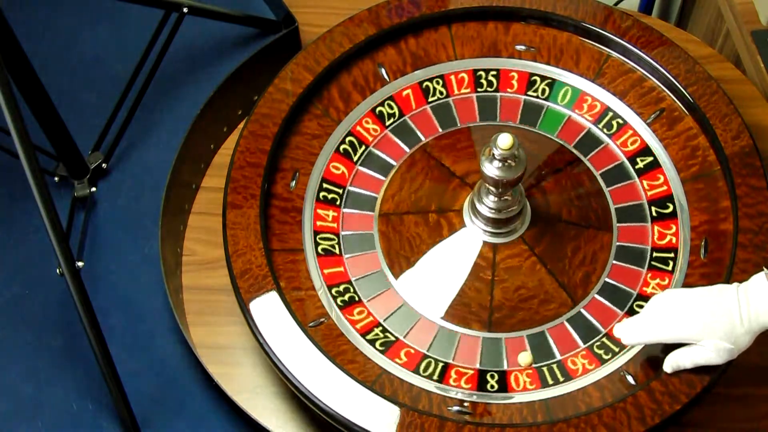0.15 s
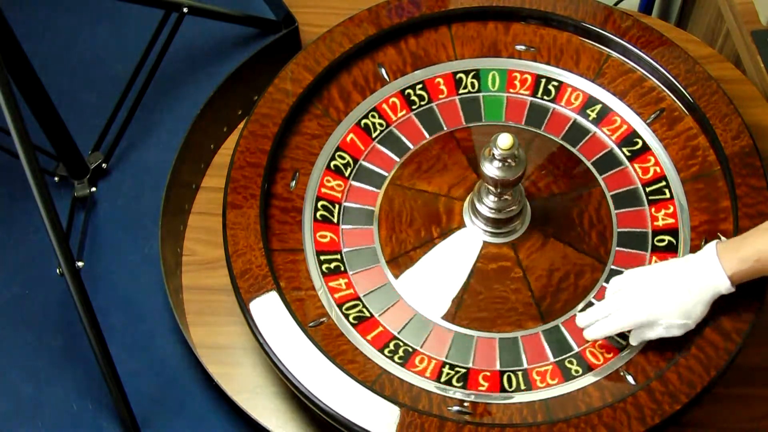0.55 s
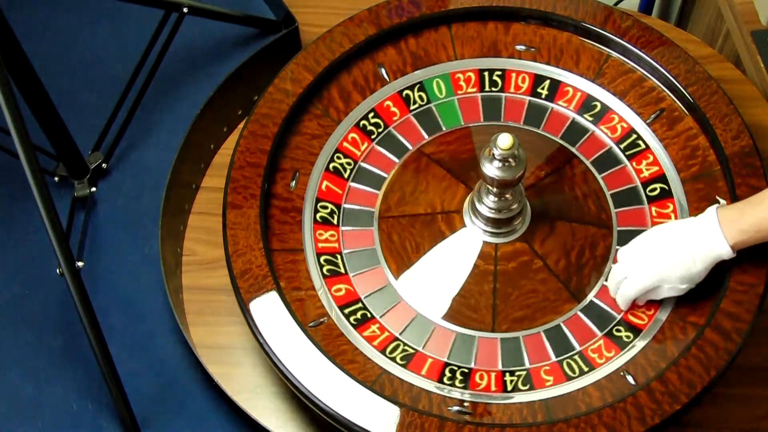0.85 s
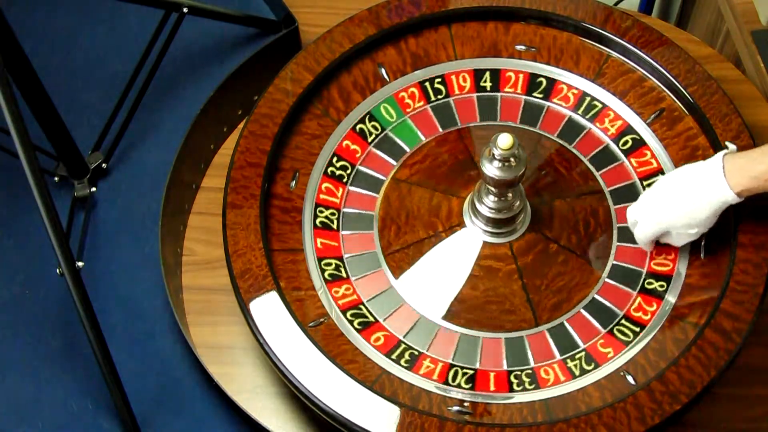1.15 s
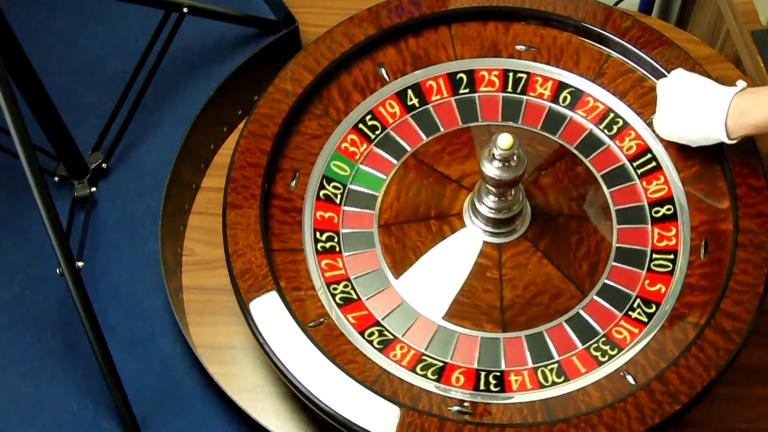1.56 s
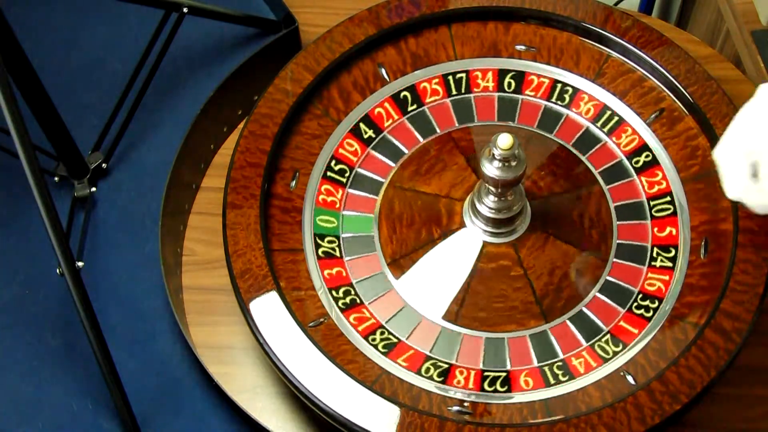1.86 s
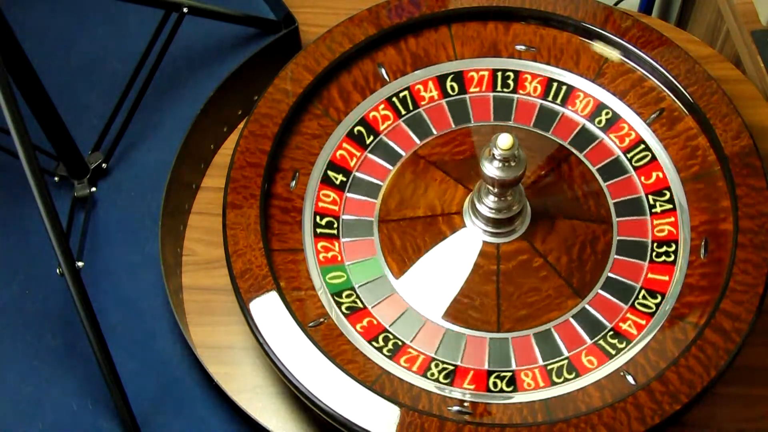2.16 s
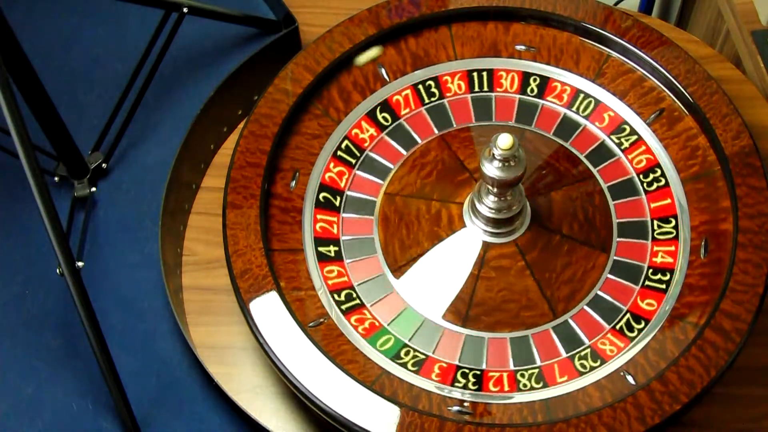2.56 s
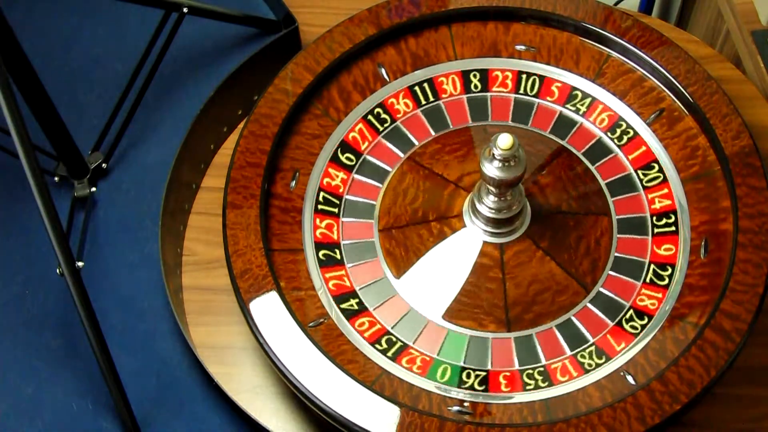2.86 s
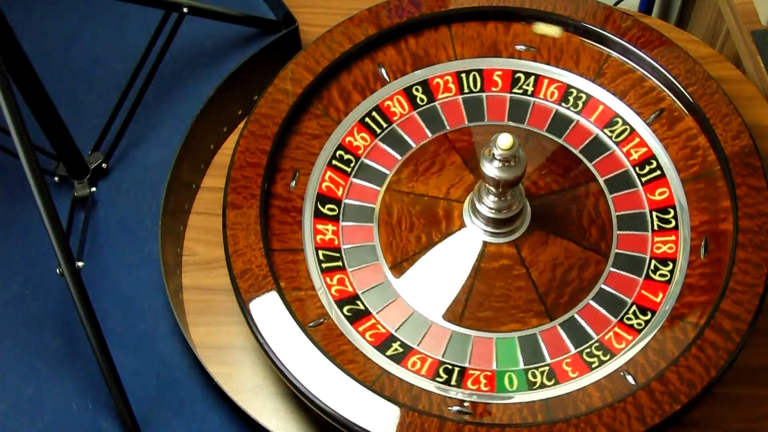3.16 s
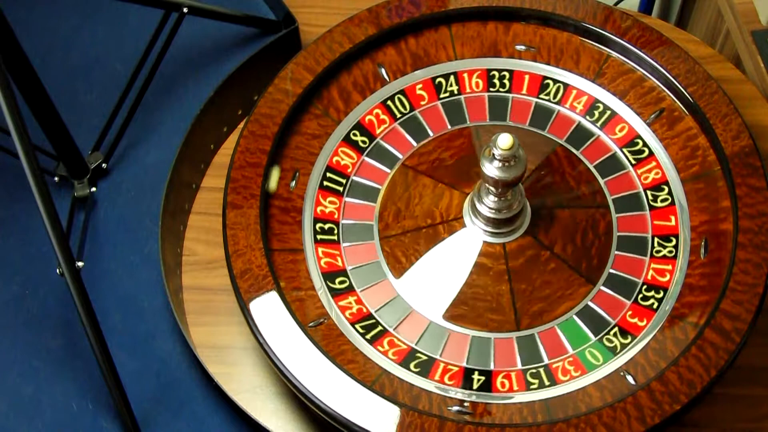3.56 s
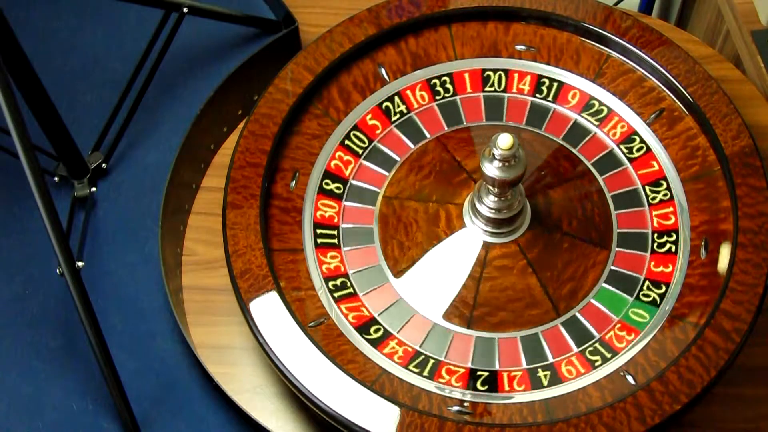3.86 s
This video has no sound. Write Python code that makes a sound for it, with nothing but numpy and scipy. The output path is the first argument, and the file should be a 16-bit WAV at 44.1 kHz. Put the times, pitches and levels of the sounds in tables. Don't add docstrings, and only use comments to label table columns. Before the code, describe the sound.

A small hard ball rolls round a wooden wheel from about 1.8 seconds to the end, a hollow, grainy rumble swelling and wavering. Before it, a faint metal rub at 0.06 and ringing scrapes with soft bumps at 0.65-0.95; a loud knock at 1.5, small rebound at 1.6, launch click at 1.8. A bounce comes at 1.98, a faint bump near 3.9. Quiet room hiss, close wide stereo.

```python
import sys
import numpy as np
from scipy import signal
from scipy.fft import rfft, irfft
from scipy.io import wavfile

SR = 44100
rng = np.random.default_rng(int(sys.argv[2]) if len(sys.argv) > 2 else 0)


def to_wav(s):
    ch = np.atleast_2d(s).T
    pcm = np.round(np.clip(ch, -1, 1) * 32767)
    wavfile.write(sys.argv[1], SR, pcm.astype(np.int16))


def ratio_of_db(decibels):
    return 10 ** (np.asarray(decibels, float) / 20)


N = 176400

# [t/s, level/dB, lowest well-driven pitch f/Hz, contact hardness/(dB/octave)]
ROLLING = [(1.799, -37.5, 1370, 3), (1.86, -33, 1050, -0.4), (1.92, -32.5, 626, 1.6),
           (2.03, -27.5, 200.9, 0.5), (2.138, -34.5, 201, 1.6), (2.211, -33, 509, 3.6),
           (2.31, -34, 523.6, 0.1), (2.41, -38, 900, 0.4), (2.52, -33.5, 657, 1), (2.591, -38, 448, 3),
           (2.649, -34.5, 693, 0.1), (2.76, -35, 605.4, 1.5), (2.87, -34.5, 506.5, 1.5),
           (3.001, -33, 236, 2.8), (3.139, -36.5, 324, 1.7), (3.27, -34, 395, 1.5), (3.66, -40, 583, 1.94),
           (4.0, -34.5, 518, -1.6)]
# [f/Hz, level/(dB/Hz)]
DENSE_WOOD = [(110, -21), (400, -7), (700, -3), (2300, -9), (3250, -13), (4300, -25), (5400, -46),
              (15000, -54.5)]
PIVOT_HZ = 900


def rms_one(x):
    return x / np.sqrt(np.mean(x ** 2) + 1e-20)


def at_hz(points, hz):
    table_hz, table_db = np.transpose(points)
    return np.interp(np.log(hz), np.log(table_hz), table_db)


def colour(x, points):
    hz = np.maximum(np.fft.rfftfreq(N, 1 / SR), 1)
    cepstrum = irfft(np.log(ratio_of_db(at_hz(points, hz))), N)
    cepstrum[1:N // 2] *= 2
    cepstrum[N // 2 + 1:] = 0
    return irfft(rfft(x) * np.exp(rfft(cepstrum)), N)


def drift(rate_per_s):
    r = np.exp(-80 * np.pi * rate_per_s / SR)
    slow = signal.lfilter([1], [1, -2 * r, r * r], rng.standard_normal(N // 40 + 2002))[2000:]
    return np.interp(np.arange(N) / 40, np.arange(len(slow)), rms_one(slow))


def resonate(x, hz, width_hz):
    r = np.exp(-np.pi * width_hz / SR)
    b = np.array([1, 0, -1]) * (1 - r * r) / 2
    return signal.lfilter(b, [1, -2 * r * np.cos(2 * np.pi * hz / SR), r * r], x)


def notch(x, share):
    # [f/Hz, width/Hz, depth/dB]
    dips = [(2850, 900, -28), (4990, 260, -16)]
    for hz, width_hz, depth_db in dips:
        w, a = 2 * np.pi * hz / SR, np.pi * width_hz / SR
        g = ratio_of_db(depth_db * share)
        x = signal.lfilter([1 + a * g, -2 * np.cos(w), 1 - a * g], [1 + a, -2 * np.cos(w), 1 - a], x)
    return x


def floor():
    # [f/Hz, level/(dB/Hz)]
    mid_spectrum = [(12, -24), (20, -0.5), (270, -8), (328, -8.5), (377, -10), (472, -13), (590, -14.5),
                    (3160, -32), (16000, -33.5)]
    # [f/Hz, level/(dB/Hz)]
    side_spectrum = [(12, -34), (20, 1), (270, -5), (328, -6), (485, -9.5), (574, -11), (678, -9.5),
                     (2820, -20.5), (16000, -22.5)]
    mid, side = rng.standard_normal((2, N))
    mid = ratio_of_db(-55.5) * rms_one(colour(mid, mid_spectrum))
    side = ratio_of_db(-54) * rms_one(colour(side, side_spectrum))
    return np.array([mid, side])


def whine():
    # [left level/dB, right level/dB]
    whine_db = [-65, -75]
    sine = np.sin(2 * np.pi * 15734 * np.arange(N) / SR)
    return sine * ratio_of_db(np.array(whine_db))[:, None] * [[1], [-1]]


def frets():
    # [f/Hz, level/dB, t60/s]
    fret_modes = [(540, -8, .12), (872, 0.1, .13), (1607, -3, .27), (2514, -7, .25), (3580, -1.5, .2)]
    # [t/s, level/dB, length/s, favoured f/Hz]
    rubs = [(0.056, -39, 0.024, 845), (.642, -50, 0.025, 1050), (0.668, -48, 0.0055, 3300),
            (0.674, -38, 0.024, 1020), (.72, -67, 0.045, 1620), (.775, -58, 0.015, 1500),
            (.868, -45.5, 0.015, 1540), (0.91, -55, 0.0081, 3460), (.912, -36.5, 0.0067, 1390),
            (.925, -79, .02, 2440), (0.943, -42, 0.013, 840)]
    away_db_per_octave, roughness = 17.0, 12.2
    out, n = 0, np.arange(N // 3)
    t = n / SR
    rough = rng.standard_normal((2, len(t)))
    for hz, db, t60_s in fret_modes:
        rub = 1e-12
        for start_s, level_db, length_s, near_hz in rubs:
            age = np.maximum(t - start_s, 0) / length_s * 3
            shape = age * np.exp(-age) / (length_s * SR / 6)
            rub = rub + ratio_of_db(level_db + db - away_db_per_octave * abs(np.log2(hz / near_hz))) * shape
        r, w = ratio_of_db(-60 / (t60_s * SR)), 2 * np.pi * hz / SR
        tone = np.cos(w * n + rng.uniform(0, 7.4, (2, 1)))
        drive = rub * (tone + roughness * rough)
        out = out + signal.lfilter([0, np.sin(w)], [1, -2 * r * np.cos(w), r * r], drive)
    return np.pad(out, ((0, 0), (0, N - len(t))))


def ticks():
    # [t/s, level/dB]
    landings = [
        (1.4983, -16.5),
        (1.612, -35),
        (1.7955, -20.5),
        (1.979, -27),
    ]
    tick_hz, t60_s, rise_s = 2247, 0.041, 0.0008
    tick = 0
    for start_s, db in landings:
        age_s = np.maximum(np.arange(N) / SR - start_s, 0)
        envelope = ratio_of_db(db - 60 * age_s / t60_s) * (1 - np.exp(-age_s / rise_s))
        tick = tick + envelope * np.sin(2 * np.pi * tick_hz * age_s)
    return tick * np.array([[1], [.8]])


def glide():
    level_db, width_hz = -8.0, 40.0
    t = np.arange(N) / SR
    s, db, focus_hz, _ = np.transpose(ROLLING)
    hz = 2 ** np.interp(t, s, np.log2(focus_hz))
    phase = 2 * np.pi * np.cumsum(hz) / SR
    hum = [drift(width_hz) * np.cos(phase) + drift(width_hz) * np.sin(phase) for _ in range(2)]
    gain = ratio_of_db(level_db + np.interp(t, s, db) + at_hz(DENSE_WOOD, hz))
    return np.array(hum) * gain * (t > s[0] + .01)


def roll_drive(hz, t):
    focus_db, focus_octaves, below_db_per_octave = 6.0, .22, 14.0
    s, db, focus_hz, hard = np.transpose(ROLLING)
    above = np.log2(hz) - np.interp(t, s, np.log2(focus_hz))
    favour_db = focus_db * np.exp(-(above / focus_octaves) ** 2)
    favour_db = favour_db + below_db_per_octave * np.clip(above, -1.5, 0)
    level_db = np.interp(t, s, db + hard * max(np.log2(hz / PIVOT_HZ), 0))
    return ratio_of_db(level_db + favour_db) * (t > s[0])


def knock_drive(hz, t):
    # [t/s, level/dB, t60/s, hardness/(dB/octave)]
    knocks = [
        (0.668, -46, .14, 4),
        (0.908, -43, 0.057, 5.5),
        (1.4972, -17.5, 0.14, 3.5),
        (1.61, -35, 0.067, -0.5),
        (1.771, -50, 0.18, 2.5),
        (1.793, -33, 0.014, 2),
        (1.8, -47.5, 0.22, -10),
        (1.977, -34, 0.19, 8.5),
        (3.936, -43, 0.072, 3.5),
    ]
    tail_db, tail_t60_s, crack_db, crack_t60_s = -17.5, 0.42, -4, 0.004
    top_hz, lag_cycles = 4170, 1.9
    out = 0
    for start_s, level_db, t60_s, hardness in knocks:
        age_s = np.maximum(t - start_s, 0)
        fade = ratio_of_db(-60 * age_s / t60_s)
        fade = fade + ratio_of_db(tail_db - 60 * age_s / tail_t60_s)
        fade = fade + ratio_of_db(crack_db - 60 * age_s / crack_t60_s)
        bloom = 1 - np.exp(-age_s * hz / lag_cycles)
        out = out + ratio_of_db(level_db + hardness * np.log2(min(hz, top_hz) / PIVOT_HZ)) * fade * bloom
    return out


def shaking(hz, sway_db):
    t, fine = np.arange(0, N + 16, 16) / SR, np.arange(N) / SR
    roll = np.interp(fine, t, roll_drive(hz, t))
    return roll * ratio_of_db(sway_db) + np.interp(fine, t, knock_drive(hz, t))


def bowl_modes(grains, lurch_db):
    # [f/Hz, width/Hz, level/dB]
    mode_table = [(123.4, 35, -10.5), (209.5, 25, -10), (241, 10.6, -10.5), (497.4, 16.3, 4.5),
                  (555, 8.3, -29), (643.4, 15.4, 1), (694, 17.7, -0.5), (788.5, 24, 2), (917.5, 10, 0),
                  (1118, 17.2, 0), (1452, 24, -5), (1702, 60, -9), (2110, 35, -7), (2417, 20, -4.5)]
    swell_db, swell_per_s = 3.0, 10.0
    out, power = 0, 0
    for k, (hz, width_hz, db) in enumerate(mode_table):
        drive = grains[k % 2] * shaking(hz, lurch_db + swell_db * drift(swell_per_s))
        out = out + (-1) ** (k // 2) * ratio_of_db(db) * resonate(drive, hz, width_hz)
        power += ratio_of_db(2 * db) * np.pi / 2 * width_hz / (SR / 2)
    return colour(out / np.sqrt(power), [(2800, 0.5), (6000, -22)])


def bowl_wood(grains, lurch_db):
    patchy_db, patchy_per_s = 1.5, 4.0
    edges = 110 * 2 ** np.arange(0, 7.3, .45)
    mids = np.sqrt(edges[1:] * edges[:-1])
    norm = np.sqrt(np.sum(ratio_of_db(2 * at_hz(DENSE_WOOD, mids)) * np.diff(edges) / (SR / 2)))
    out = 0
    for k, hz in enumerate(mids):
        sos = signal.butter(2, edges[k:k + 2], "band", fs=SR, output="sos")
        drive = grains[k % 2, ::-1] * shaking(hz, lurch_db + patchy_db * drift(patchy_per_s))
        out = out + signal.sosfilt(sos, drive) / norm
    return colour(out, DENSE_WOOD)


def bowl():
    grains_per_s, grain_db, smooth_power, modes_db = 4000.0, 3.0, 0.18, 1.0
    grain_power = ratio_of_db(grain_db * np.minimum(rng.exponential(1, N), 5)) ** 2
    hits = rng.random(N) < grains_per_s / SR
    grains = rms_one(np.sqrt(grain_power * hits + smooth_power)) * rng.standard_normal((2, 2, N))
    lurch_db = drift(1.67) + 1.56 * drift(29.0)
    modes = ratio_of_db(modes_db) * bowl_modes(grains, lurch_db)
    wood = ratio_of_db(-modes_db) * bowl_wood(grains, lurch_db)
    return (modes + wood) / np.sqrt(2)


def scene():
    # [f/Hz, level/dB]
    port_width = [(60, -31), (130, -11), (290, -17.5), (640, -4.5), (1410, 3), (3100, 6), (6820, 7.5),
                  (15000, 7)]
    lean, floor_notch_share = -0.39, 0.52
    mid, side = bowl() + frets() + glide() + ticks()
    side = colour(side + lean * mid, port_width)
    mid, side = notch(np.array([mid, side]), 1) + notch(floor(), floor_notch_share)
    return np.array([mid + side, mid - side]) + whine()


def top_cut(x):
    return signal.sosfilt(signal.butter(12, 16450, fs=SR, output="sos"), x)


def record(dry):
    overload, top_hz = 0.5, 15840
    rounded = overload * np.tanh(dry / overload)
    cut = irfft(rfft(rounded) * (np.fft.rfftfreq(N, 1 / SR) < top_hz), N)
    return top_cut(cut)


dry = scene()
out = record(dry)
to_wav(out)
```